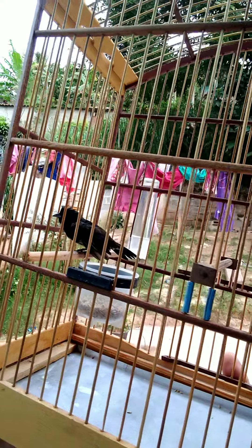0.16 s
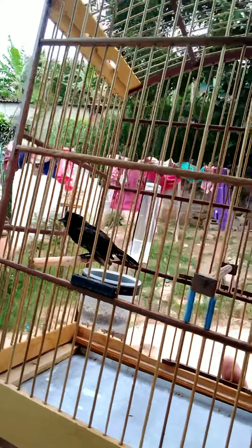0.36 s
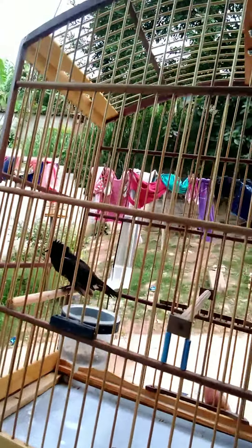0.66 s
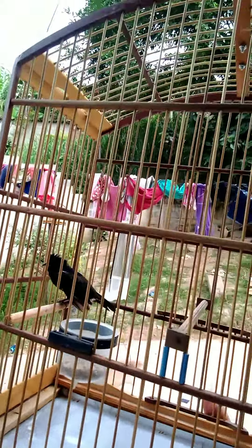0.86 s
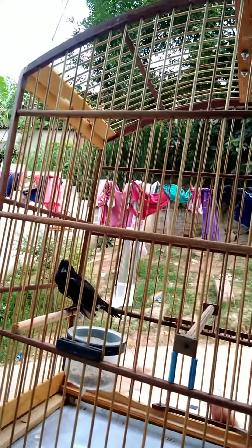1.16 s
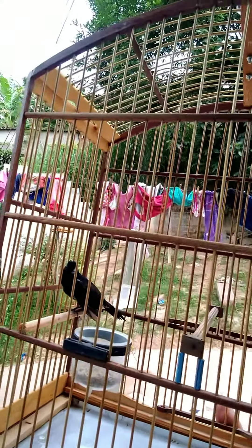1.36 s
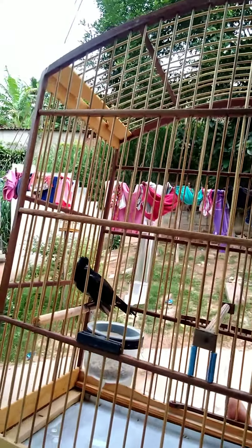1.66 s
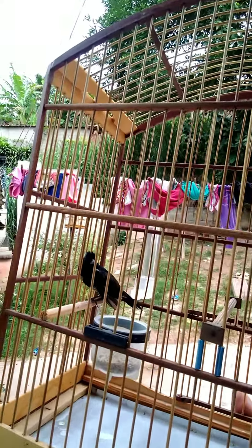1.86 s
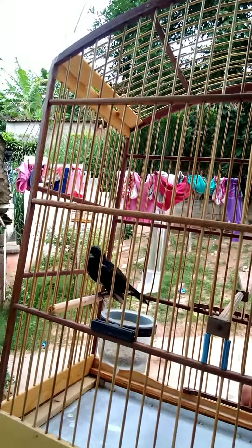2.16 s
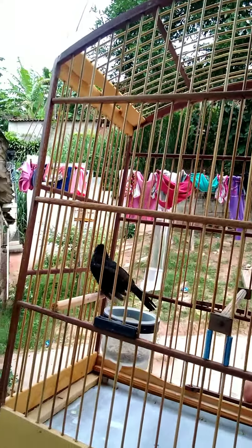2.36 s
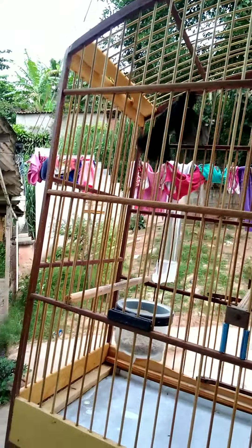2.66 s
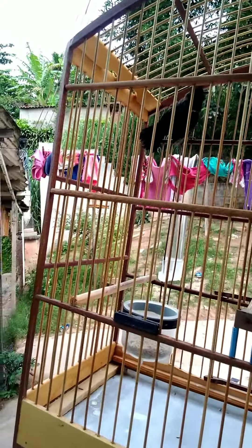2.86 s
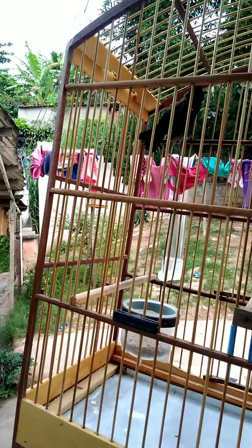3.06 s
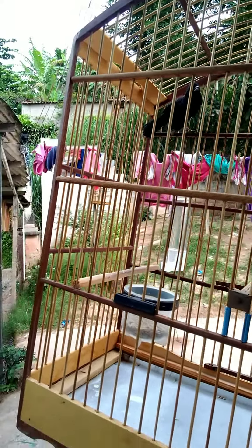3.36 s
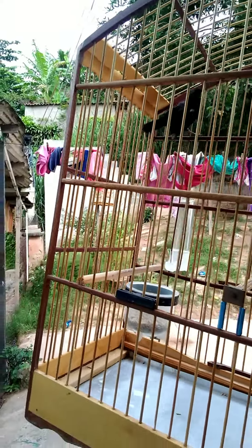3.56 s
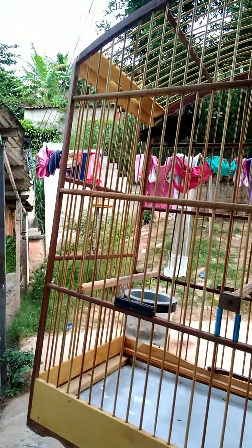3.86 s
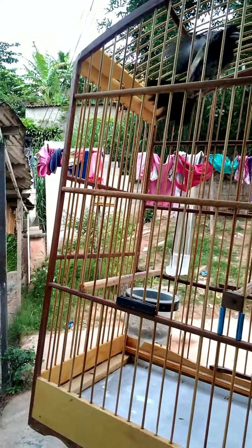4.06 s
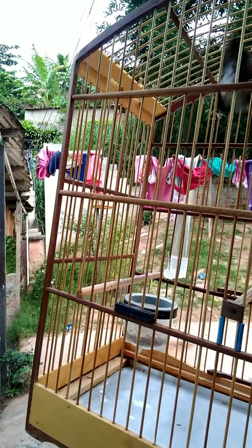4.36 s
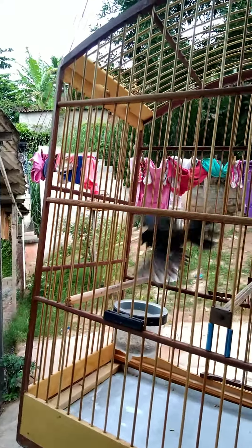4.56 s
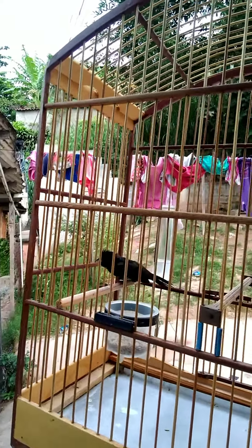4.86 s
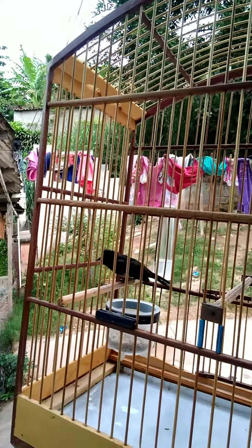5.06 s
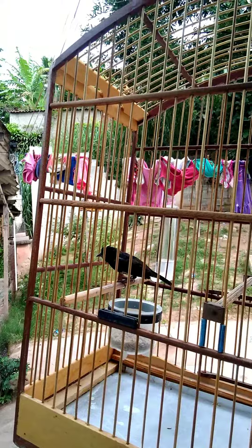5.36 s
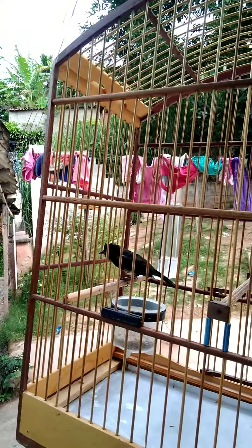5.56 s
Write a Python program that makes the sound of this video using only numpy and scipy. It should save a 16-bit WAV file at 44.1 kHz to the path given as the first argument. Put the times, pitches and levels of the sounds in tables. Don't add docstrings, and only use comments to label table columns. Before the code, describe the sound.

Near silence, then a low pop and thump within the first 0.15 s as the phone input opens, catching the fading whistle of a previous birdsong. Faint hiss and light wind sit underneath. A distant neighbour buzzes at 0.2-0.5 s and closes on a whistle. Around 1 s comes a nasal rising call and a hollow wooden knock with quick slap-backs. From 1.3 to 2.75 s another far bird slurs falling whistles and hoarse dipping notes, blurred by yard echo. The close caged bird adds tiny high chips between 2.3 and 4.1 s, some with soft air puffs; a neighbour answers at 3.15 s. Wind strengthens after 3.9 s. Dry cage scratches at 4.45-4.6 s lead into the loud song: six snapping sweeps with air thumps, a harsh rapid buzz until 4.9 s, then a two-toned whistle near 5.4 kHz. Choppy wind buffeting swells to the end, with faint ticks.

```python
import sys
import numpy as np
from scipy import signal
from scipy.io import wavfile

SR = 44100
rng = np.random.default_rng(int(sys.argv[2]) if len(sys.argv) > 2 else 0)


def log_audio(samples):
    frames = np.atleast_2d(samples).T
    limited = np.clip(frames, -1, 1)
    pcm = np.round(limited * 32767).astype(np.int16)
    wavfile.write(sys.argv[1], SR, pcm)


def ratio_of_db(decibels):
    return 10 ** (np.asarray(decibels, float) / 20)


N = 252252


def rms_one(x):
    return x / np.sqrt(np.mean(x ** 2) + 1e-20)


def add(out, s, piece):
    i = round(s * SR)
    out[i:i + len(piece)] += piece[:N - i]


def over_span(rows):
    s, *columns = np.transpose(rows)
    t = np.arange(s[0], s[-1], 1 / SR)
    return [np.interp(t, s, c) for c in columns]


def drift(rate_hz, size):
    r = np.exp(-2 * np.pi * rate_hz / SR)
    settle = 9000
    white = rng.standard_normal((size // SR + 1) * SR + settle)
    slow = signal.lfilter([1], [1, -2 * r, r * r], white)
    return rms_one(slow[settle:settle + size])


def soft_ends(x, fade_s):
    from_start = np.arange(len(x))
    edge = np.minimum(from_start, from_start[::-1]) / (fade_s * SR)
    return x * np.minimum(edge, 1)


def sine(hz):
    return np.sqrt(2) * np.sin(2 * np.pi * np.cumsum(hz) / SR)


def hump(length_s):
    return np.hanning(max(round(length_s * SR), 3))


def ring(x, hz, t60):
    r, w = ratio_of_db(-60 / (t60 * SR)), 2 * np.pi * hz / SR
    return signal.lfilter([0, np.sin(w)], [1, -2 * r * np.cos(w), r * r], x + 1e-18)


def bands(spectrum, level_of):
    out, edges = 0, 28 * 2 ** np.arange(0, 8.6, .5)
    white = rng.standard_normal((2, N))
    spectrum_hz, spectrum_db = np.transpose(spectrum)
    for k, (low, high) in enumerate(zip(edges, edges[1:])):
        hz = np.sqrt(low * high)
        band_pass = signal.butter(2, [low, high], "band", fs=SR, output="sos")
        band = signal.sosfilt(band_pass, white[k % 2])
        colour_db = np.interp(np.log(hz), np.log(spectrum_hz), spectrum_db)
        out = out + band * ratio_of_db(colour_db + level_of(hz))
    return out


def whistles(notes, wavers, quiver_db):
    out = np.zeros(N)
    for note, waver in zip(notes, wavers):
        hz, db = over_span(note)
        pitch = hz * (1 + waver * drift(150, len(hz)))
        tone = sine(pitch) * ratio_of_db(db + quiver_db * drift(80, len(hz)))
        add(out, note[0][0], soft_ends(tone, 0.0035))
    return out


PULSE_RATE = [(0, 202), (.78, 201), (.83, 245), (1, 250)]


def buzz(rows, swing_hz):
    db, hz = over_span(rows)[:2]
    size = len(hz)
    per_s = np.interp(np.linspace(0, 1, size), *np.transpose(PULSE_RATE))
    cycle = np.cumsum(per_s * (1 + .015 * drift(60, size))) / SR % 1
    shape = np.sin(np.pi * cycle) ** 1.1 * np.exp(-1.4 * cycle)
    shape = soft_ends(rms_one(shape * ratio_of_db(.8 * drift(150, size))), .002)
    swoop = np.cos(2 * np.pi * (cycle - .06))
    pitch = hz + 330 + swing_hz * swoop + 60 * drift(300, size)
    return ratio_of_db(db) * shape * sine(pitch), shape


# frequency in Hz, density in dB per Hz.
AMBIENT_SPECTRUM = [(180, -20), (300, 2), (500, -18.5), (2000, -16), (5000, -23.5), (7500, -20),
                    (8400, -39), (11000, -75)]


def yard_hiss():
    return ratio_of_db(-69 - 3.5) * rms_one(bands(AMBIENT_SPECTRUM, lambda hz: 0))


# frequency in Hz, density in dB per Hz.
WIND_SPECTRUM = [(18, -39), (30, -13), (49, 1), (85, 1), (146, -5.5), (185, -7), (454, -16), (603, -17.5),
                 (859, -22), (1350, -23), (4180, -37.5), (6870, -51.5), (7730, -56), (8500, -71),
                 (11000, -108), (18700, -120)]
# time in seconds, level in dB.
GUST_STRENGTH = [(0.13, -74), (0.28, -62.5), (0.4, -65.5), (0.51, -60.5), (0.86, -73.5), (1.16, -61.5),
                 (1.3, -66.5), (1.899, -61), (2.7, -59), (2.98, -62), (3.25, -62.5), (3.4, -58.5),
                 (3.91, -58), (3.95, -53.5), (4.15, -47.5), (4.4, -50), (5.0, -48.5), (5.72, -43.5)]
# start in seconds, length in seconds.
CHOPPY_SPELLS = [
    (3.931, 0.31),
    (4.34, 0.28),
    (4.872, 0.274),
    (5.614, 0.17),
]
# start in seconds, length in seconds, drop in dB.
WIND_LULLS = [(3.907, 0.024, -4.5), (4.141, 0.048, -10.5), (4.346, 0.065, -8), (4.563, 0.021, -14),
              (5.067, 0.045, -8), (5.113, 0.028, -14.5), (5.62, 0.021, -17), (5.657, 0.029, -12),
              (5.691, 0.018, -10.5)]
MEAN_GUST_DB, CALM_FLUTTER_DB, STRONG_FLUTTER_DB = -58, 2.65, 4.5


def wind():
    gust_db = np.interp(np.arange(N) / SR, *np.transpose(GUST_STRENGTH))
    swing = gust_db - MEAN_GUST_DB
    layers = -49.5 + swing, gust_db + 10.5, -51 + 1.04 * swing
    depth = np.full(N, CALM_FLUTTER_DB)
    for s, length in CHOPPY_SPELLS:
        extra = np.full(round(length * SR), STRONG_FLUTTER_DB - CALM_FLUTTER_DB)
        add(depth, s, soft_ends(extra, .015))
    flutter = depth * (0.21 * drift(17, N) + 0.89 * drift(98, N))
    for s, length, drop_db in WIND_LULLS:
        add(flutter, s - .004, drop_db * signal.windows.tukey(round((length + 0.0032) * SR), .5))

    def level_of(hz):
        place = np.interp(np.log(hz), np.log([110, 700, 2900]), [0, 1, 2])
        share = np.maximum(1 - np.abs(place - np.arange(3)), 0)
        mean_db = sum(part * layer for part, layer in zip(share, layers))
        return mean_db + flutter * (.5 + 0.16 * place)
    return ratio_of_db(21.5) * bands(WIND_SPECTRUM, level_of)


def yard(x, first_s, lumpy_db):
    t = np.arange(SR // 2) / SR
    near_walls = ratio_of_db(-60 * t / 0.29)
    far_walls = ratio_of_db(-17 - 60 * t / 0.61)
    lumps = ratio_of_db(lumpy_db * drift(120, len(t)))
    echoes = rng.standard_normal(len(t)) * (near_walls + far_walls) * lumps * (t > first_s)
    return signal.fftconvolve(x, echoes / np.sqrt(np.sum(echoes ** 2)))[:N]


def slur(s, fall_s, top_hz, low_hz, db, swell_db, power):
    t = np.arange(0, 0.099, .002)
    high = np.exp(-(t / fall_s) ** 2)
    fade_db = 112 * np.maximum(t - 1.16 * fall_s, 0)
    return np.transpose([s + t, low_hz + (top_hz - low_hz) * high, db - swell_db * high ** power - fade_db])


DIP_START_HZ, DIP_SETTLE_HZ, DIP_AT_S, DIP_CLIMB_S = 3750, 4045, .031, .029


def dip(s, length, dip_hz, db):
    t = np.arange(0, length, .002)
    climb = 1 - np.exp(-(np.maximum(t - DIP_AT_S, 0) / DIP_CLIMB_S) ** 2)
    hz = np.interp(t, [0, DIP_AT_S], [DIP_START_HZ, dip_hz]) + (DIP_SETTLE_HZ - dip_hz) * climb
    loss_db = .012 * np.maximum(DIP_START_HZ - hz, 0) + 8.5 * (1 - climb)
    fade_db = 173 * np.maximum(t - DIP_AT_S - DIP_CLIMB_S, 0)
    return np.transpose([s + t, hz, db - loss_db - fade_db])


# start in seconds, length in seconds, start and end pitch in Hz, level in dB.
PLAIN_GLIDES = [(.385, 0.059, 5100, 5600, -71), (1.293, .04, 6850, 6500, -83),
                (1.389, 0.076, 5150, 4280, -51), (1.582, 0.028, 6800, 6420, -55),
                (1.596, 0.0086, 6450, 8300, -47.5), (1.69, 0.065, 2400, 2950, -64),
                (1.724, 0.066, 4860, 4710, -51), (1.888, 0.011, 6360, 8100, -53),
                (2.0, 0.086, 5150, 5150, -45.5), (2.155, .014, 5750, 6220, -48),
                (2.238, 0.031, 4700, 4760, -60), (2.178, .12, 1760, 1947, -67),
                (2.53, .35, 1950, 1988, -69), (3.374, 0.2, 1930, 1930, -64.5),
                (3.567, 0.041, 2050, 2260, -68)]
# start and fall time in seconds, top and low pitch in Hz, level in dB.
FALLING_SLURS = [
    (1.29, .046, 7530, 5260, -54.5),
    (1.599, .04, 6830, 4480, -50),
    (1.90, .058, 7700, 5100, -47.5),
    (2.162, .024, 6570, 4795, -47.5),
]
FAINT_SLURS = [
    (2.352, 0.015, 6500, 4193, -47),
]
# time in seconds, pitch in Hz, level in dB.
RASPY_CLIMB = [(2.11, 3850, -53), (2.185, 4230, -56)]
# start and length in seconds, dip pitch in Hz, level in dB, pitch waver as a share.
HOARSE_DIPS = [
    (2.295, 0.079, 3410, -44.5, .045),
    (2.487, 0.15, 3010, -45, .036),
    (2.668, 0.1, 2680, -46.5, 0.044),
]


def far_whistles():
    glides = [[(s, start_hz, db), (s + length, end_hz, db - 6.5)]
              for s, length, start_hz, end_hz, db in PLAIN_GLIDES]
    slurs = [slur(*row, swell_db=9, power=5.0) for row in FALLING_SLURS]
    faint = [slur(*row, swell_db=37, power=1.0) for row in FAINT_SLURS]
    dips = [dip(*row[:-1]) for row in HOARSE_DIPS]
    out = whistles(glides, [0.012] * len(glides), quiver_db=3.0)
    out += whistles(slurs, [.009] * len(slurs), quiver_db=3.5)
    out += whistles(faint, [0.022] * len(faint), quiver_db=5.5)
    out += whistles([RASPY_CLIMB], [.05], quiver_db=4.0)
    out += whistles(dips, [row[-1] for row in HOARSE_DIPS], quiver_db=3.0)
    return out


# start in seconds, buzz length in seconds, level at its end in dB.
NEIGHBOUR_SONGS = [
    (0.193, .298, -60.5),
    (3.147, .27, -59),
]


def far_songs():
    out, start_hz, end_hz = np.zeros(N), 7240, 6750
    for s, length, db in NEIGHBOUR_SONGS:
        end = s + length
        middle = (s + 0.35 * length, db - 3, (start_hz + end_hz) / 2 - 120)
        add(out, s, buzz([(s, db - 14, start_hz), middle, (end, db, end_hz)], swing_hz=700)[0])
        close_db = db + 8.5
        close = [(end, 5470, close_db), (end + 0.082, 5470, close_db - 14)]
        out += whistles([close], [.008], quiver_db=3.5)
    return out


# time in seconds, fundamental in Hz, level in dB.
NASAL_CALLS = [
    [(.945, 2150, -63), (.965, 1946, -61.5), (1.0, 1870, -62.5), (1.035, 2050, -56.5), (1.06, 2301, -50),
     (1.12, 2354, -68.5)],
    [(1.665, 1870, -52.5), (1.70, 1883, -58.5)],
]
NASAL_PARTIALS = [
    [-9, -3, -5, -6.5],
    [-9, -0.76, -19, -21],
]


def nasal_calls():
    out = np.zeros(N)
    for note, partials_db in zip(NASAL_CALLS, NASAL_PARTIALS):
        hz, db = over_span(note)
        hz = hz * (1 + .027 * drift(200, len(hz)))
        stack = sum(ratio_of_db(p) * sine(hz * (k + 1)) for k, p in enumerate(partials_db))
        add(out, note[0][0], soft_ends(stack * ratio_of_db(db + 5.0 * drift(170, len(hz))), 0.0024))
    return out


# frequency in Hz, level in dB, 60 dB decay time in seconds.
WOOD_MODES = [(745, -3, 0.051), (900, -2.5, 0.026), (980, -10, 0.02), (1670, -15, 0.013), (2150, -13, 0.02),
              (2610, -9.5, 0.013), (3070, -12, 0.0076)]
# time in seconds, level in dB.
WOOD_BLOWS = [
    (1.046, -34),
    (1.077, -36.5),
    (1.094, -42.5),
    (1.111, -45),
    (1.136, -56),
]


def knock():
    out = np.zeros(N)
    for s, blow_db in WOOD_BLOWS:
        blow = np.zeros(4000)
        blow[:130] = rng.standard_normal(130) * np.hanning(130) / 9
        blow[60] += .9
        rings = sum(ratio_of_db(db + 1.6 * rng.standard_normal()) * ring(blow, hz, t60) for hz, db, t60 in WOOD_MODES)
        crack = 4.5 * signal.lfilter([.35], [1, -.65], blow)
        add(out, s, ratio_of_db(blow_db) * (rings + crack))
    return signal.sosfilt(signal.butter(3, 660, "high", fs=SR, output="sos"), out)


# time in seconds, peak level in dB.
CAGE_TICKS = [(2.583, -47), (2.7686, -49), (3.973, -50), (4.0257, -51), (4.067, -47), (4.4448, -38),
              (4.498, -28.5), (4.537, -38), (4.588, -26.5), (5.101, -51), (5.6376, -50), (5.6725, -46),
              (5.6944, -46)]


def ticks():
    out = np.zeros(N)
    for s, db in CAGE_TICKS:
        add(out, s, ratio_of_db(db - 8.5) * rng.standard_normal(400) * np.exp(-np.arange(400) / 105.0))
    return out


# time in seconds, peak level in dB, pitch in Hz, under-note level in dB, low thump level in dB.
CAGED_CHIPS = [(2.3357, -44.5, 7850, -50, -39.5), (2.615, -66, 7520, -64, -50),
               (2.643, -73, 6750, -64, -59), (2.7592, -68, 7900, -61, -43), (2.795, -70, 7650, -59, -48),
               (2.808, -74, 7560, -57, -34), (3.2814, -41, 7960, -53.5, -34),
               (3.4505, -51.5, 8070, -57, -29.5), (3.703, -44, 8020, -60, -31.5),
               (3.9272, -54, 8100, -70, -24), (4.088, -55, 7970, -68, -57)]


def chips():
    voice, thumps = np.zeros(N), np.zeros(N)
    for s, db, hz, under_db, thump_db in CAGED_CHIPS:
        shape = hump(0.0037)
        add(voice, s - .0015, ratio_of_db(db + 8.0) * shape * sine(hz * np.linspace(.92, 1.06, len(shape))))
        shape = hump(0.0019)
        add(voice, s + 0.006, ratio_of_db(under_db) * shape * sine(np.linspace(4200, 5000, len(shape))))
        add(thumps, s + 0.01016, ratio_of_db(thump_db) * hump(0.0037))
    return voice, thumps + 0.046 * ring(thumps, 69, 0.028)


# start in seconds, peak level in dB, length in seconds, low thump level in dB.
OPENING_NOTES = [
    (4.5998, -23, .0035, -30),
    (4.6035, -18, .0045, -22),
    (4.6170, -18, .006, -14),
    (4.6310, -17, .007, -11),
    (4.6455, -18, .007, -11),
    (4.6580, -21, .005, -15),
]


def opening():
    voice, thumps = np.zeros(N), np.zeros(N)
    t = np.arange(3000) / SR
    swell = 2.8 * (1 - np.exp(-t / 0.0028)) * np.exp(-t / 0.0099)
    for k, (s, db, length, thump_db) in enumerate(OPENING_NOTES):
        shape = hump(length)
        start_hz, end_hz = (6100, 8100) if k < 2 else (8350, 6450)
        add(voice, s, ratio_of_db(db - 1.5) * shape * sine(np.linspace(start_hz, end_hz, len(shape))))
        add(thumps, s + .0001, -0.73 * ratio_of_db(thump_db) * hump(0.00186))
        add(thumps, s + .0016, ratio_of_db(thump_db) * swell)
        crackle = hump(.004) * rng.standard_normal(len(hump(.004)))
        add(thumps, s + 0.00076, ratio_of_db(thump_db - 28.5) * crackle)
    return voice, thumps


# time in seconds, rms level in dB, centre pitch in Hz.
SONG_BUZZ = [(4.6626, -28.5, 7140), (4.701, -23.5, 7210), (4.781, -21.5, 6960), (4.851, -22, 6760),
             (4.878, -27, 6530), (4.891, -31, 6330)]
PREVIOUS_BUZZ = [(0, -38, 6950), (.102, -39, 6640)]


def buzzing():
    voice, thumps = np.zeros(N), np.zeros(N)
    add(voice, 0, buzz(PREVIOUS_BUZZ, swing_hz=600)[0])
    start_s = SONG_BUZZ[0][0]
    tone, shape = buzz(SONG_BUZZ, swing_hz=620)
    add(voice, start_s, tone)
    t = np.arange(len(shape)) / SR
    die_away = ratio_of_db(-1295 * np.maximum(t - 0.1864, 0))
    add(thumps, start_s, -ratio_of_db(-30.5 - 26 * t) * die_away * shape ** 2)
    rasp = rms_one(signal.lfilter([1], [1, -1.72, .74], rng.standard_normal(SR))[:len(shape)])
    attack = np.minimum(0.44 + t / 0.038, 1)
    add(thumps, start_s, ratio_of_db(-40.5) * die_away * attack * rasp * (0.68 + 0.71 * shape))
    return voice, thumps


# time after the start in seconds, pitch in Hz, level in dB.
CLOSING_VOICES = [
    [(0, 5150, -14), (.003, 5380, -6), (.015, 5390, -1), (.023, 5400, -3), (.047, 5410, -2),
     (.072, 5410, -9)],
    [(.018, 5820, -7), (.031, 5620, -11), (.046, 5640, -7), (.069, 5600, -14)],
]
# start in seconds, rms level in dB.
CLOSING_STARTS = [
    (.104, -32.5),
    (4.889, -24.5),
]


def closing_whistle():
    notes = [np.add(part, [s, 0, db]) for s, db in CLOSING_STARTS for part in CLOSING_VOICES]
    return whistles(notes, [.004, .011] * 2, quiver_db=2.4)


def song():
    (opening_voice, opening_thumps), (buzz_voice, buzz_thumps) = opening(), buzzing()
    return opening_voice + buzz_voice + closing_whistle(), opening_thumps + buzz_thumps


def scene():
    (song_voice, song_thumps), (chip_voice, chip_thumps) = song(), chips()
    near = song_voice + chip_voice
    near = near + ratio_of_db(-10) * np.roll(near, round(0.0025 * SR))
    far = far_whistles() + far_songs() + nasal_calls() + knock()
    direct = near + song_thumps + chip_thumps + ticks() + ratio_of_db(-2.0) * far + wind() + yard_hiss()
    near_echo = ratio_of_db(-15) * yard(near, 0.0044, lumpy_db=-5.0)
    far_echo = yard(far, 0.0077, lumpy_db=3.0)
    return (direct + near_echo + far_echo)[None]


def roll_off(x):
    return signal.sosfilt(signal.butter(12, 8930, fs=SR, output="sos"), x)


# time in seconds, step height.
OFFSET_STEPS = [
    (0.056, 0.055),
    (0.0571, -0.07),
    (0.081, .002),
    (0.1193, -0.031),
    (0.141, .003),
]


def record(dry):
    x = dry * (np.arange(N) >= .1195 * SR)
    steps = np.zeros(N)
    for s, height in OFFSET_STEPS:
        steps[round(s * SR):] += height
    x = signal.sosfilt(signal.butter(4, 45, "high", fs=SR, output="sos"), x + steps)
    x = signal.sosfilt(signal.cheby2(12, 60, 9000, fs=SR, output="sos"), x)
    return roll_off(x)


dry = scene()
out = record(dry)
log_audio(out)
```